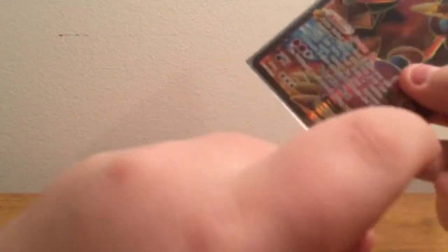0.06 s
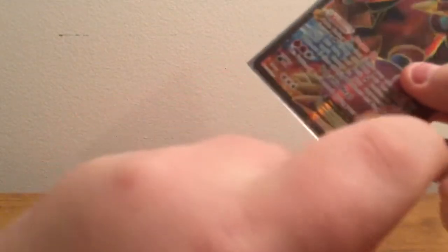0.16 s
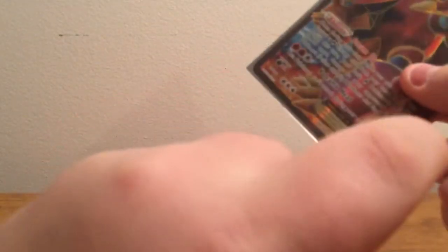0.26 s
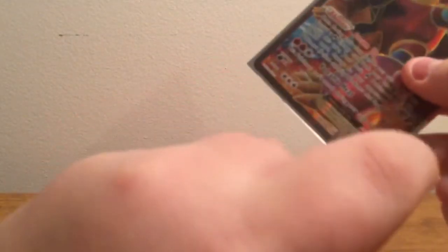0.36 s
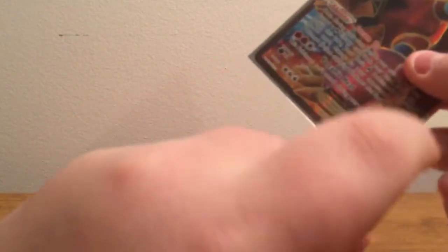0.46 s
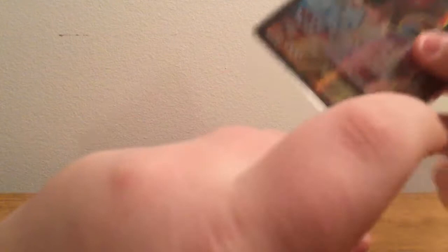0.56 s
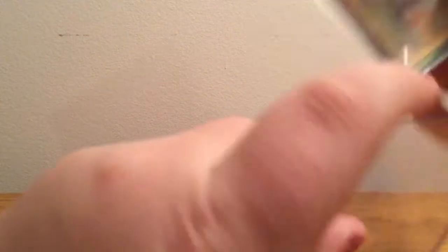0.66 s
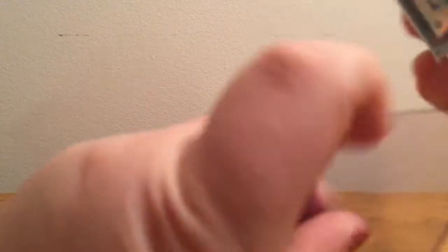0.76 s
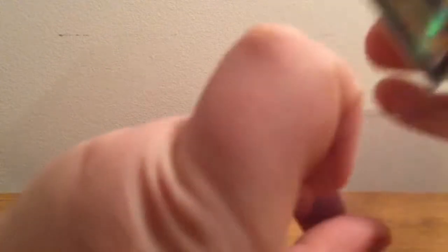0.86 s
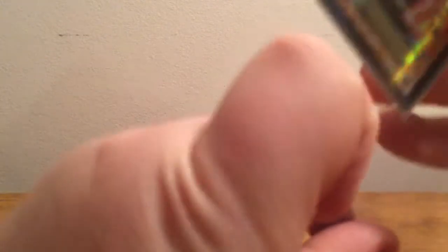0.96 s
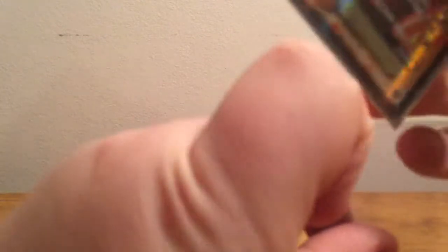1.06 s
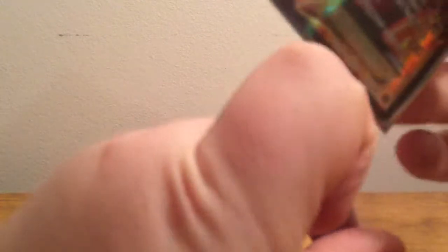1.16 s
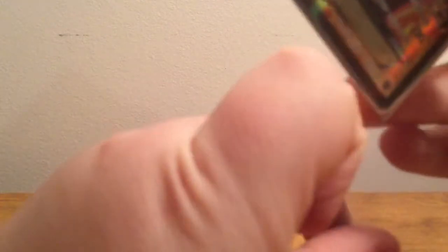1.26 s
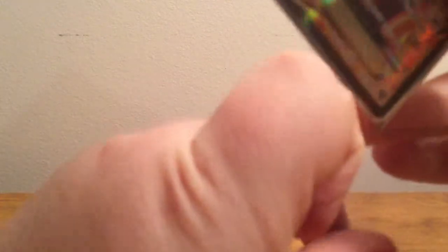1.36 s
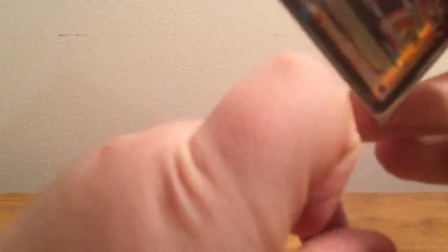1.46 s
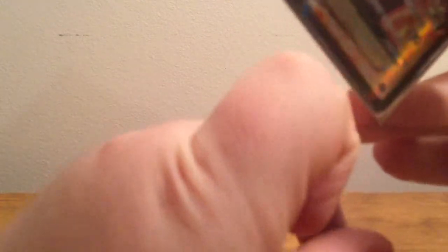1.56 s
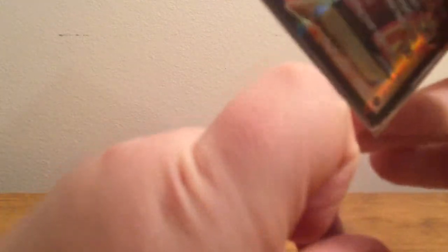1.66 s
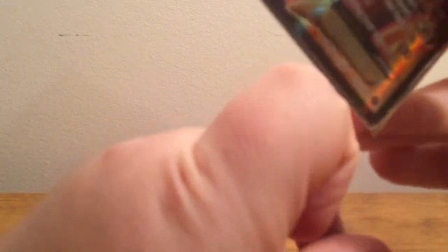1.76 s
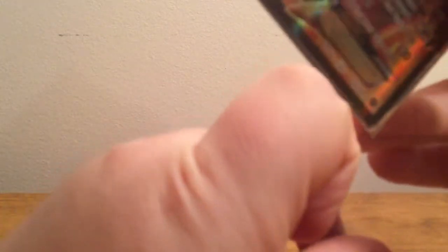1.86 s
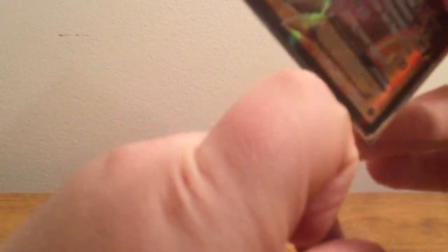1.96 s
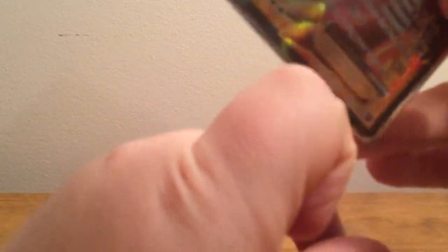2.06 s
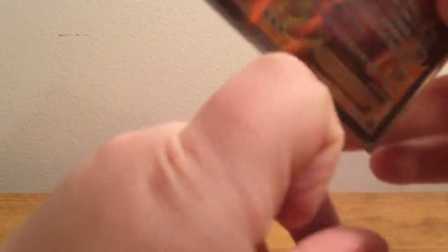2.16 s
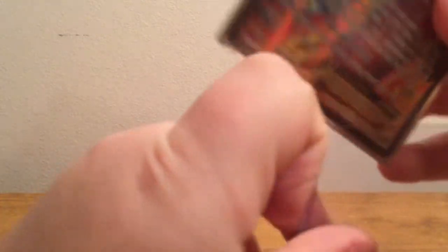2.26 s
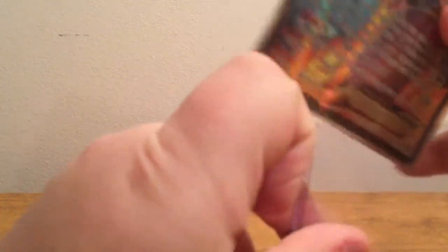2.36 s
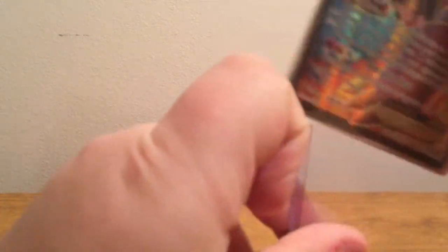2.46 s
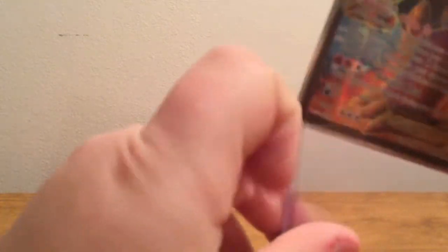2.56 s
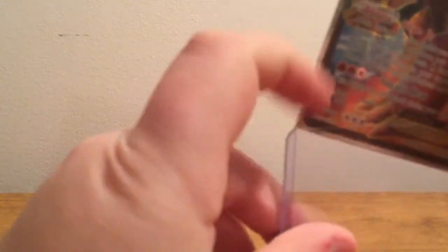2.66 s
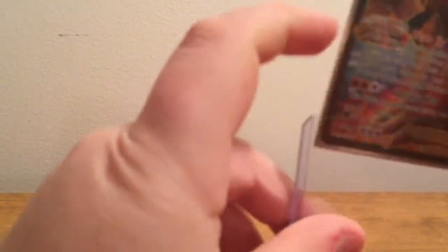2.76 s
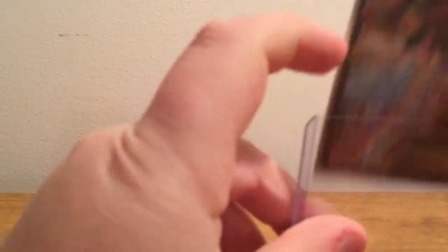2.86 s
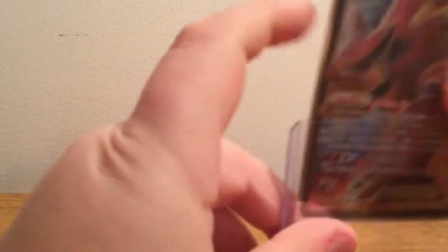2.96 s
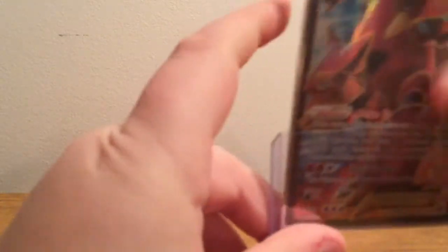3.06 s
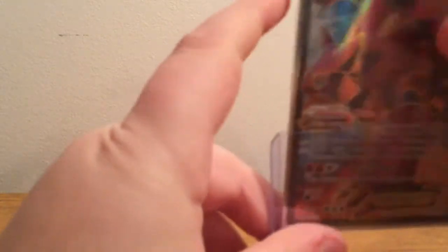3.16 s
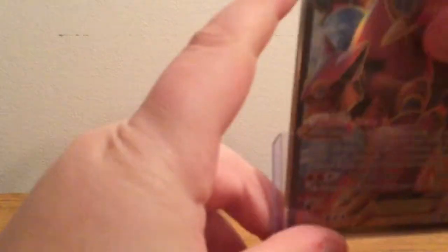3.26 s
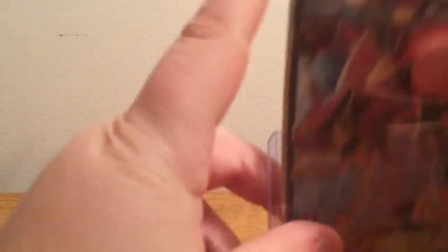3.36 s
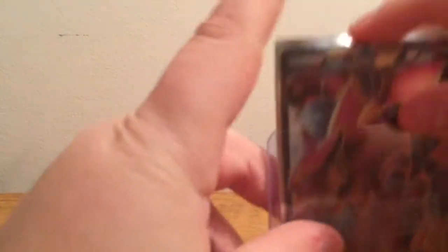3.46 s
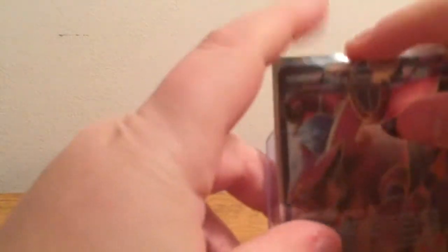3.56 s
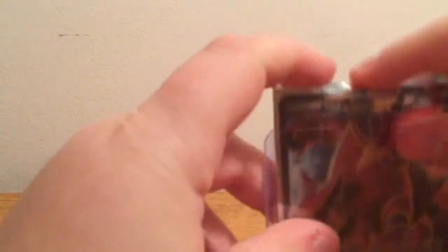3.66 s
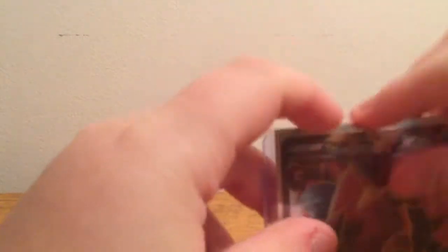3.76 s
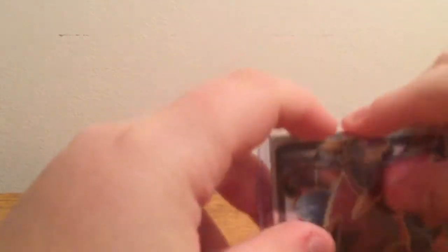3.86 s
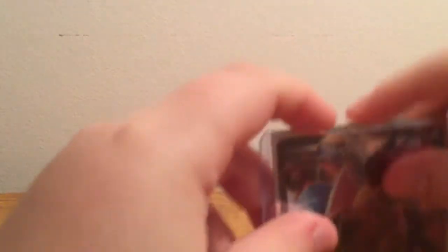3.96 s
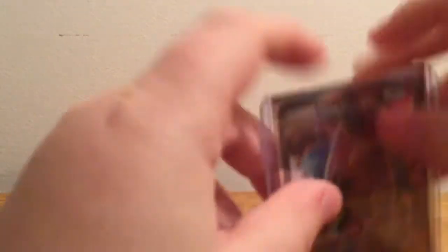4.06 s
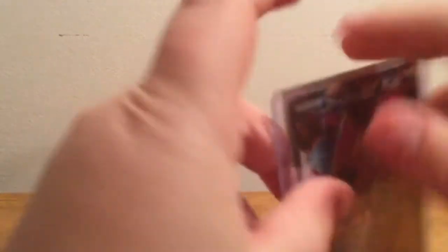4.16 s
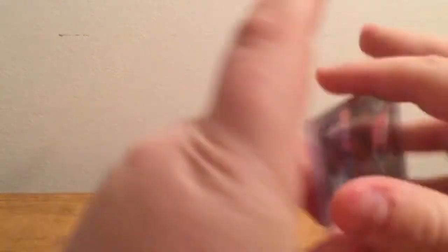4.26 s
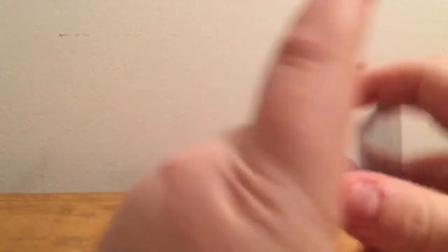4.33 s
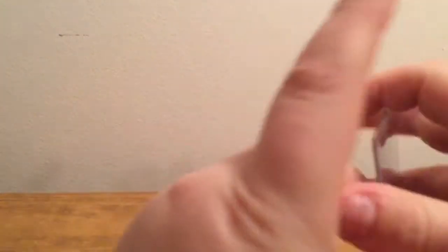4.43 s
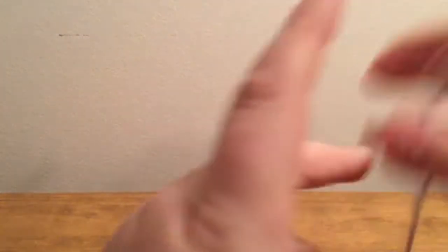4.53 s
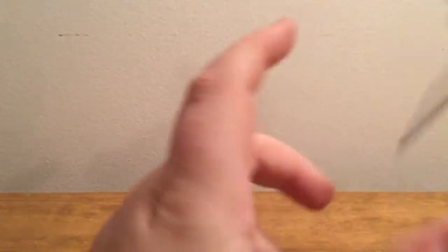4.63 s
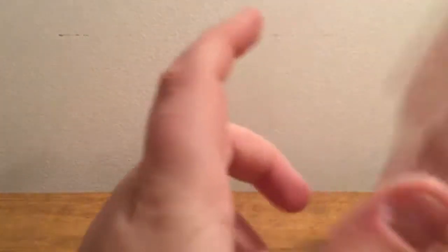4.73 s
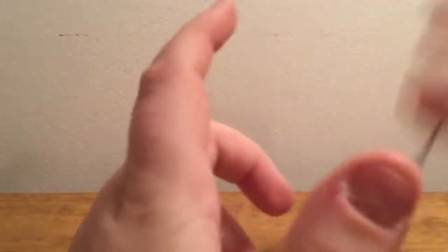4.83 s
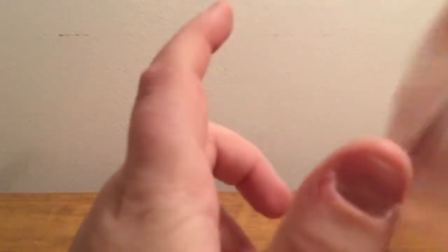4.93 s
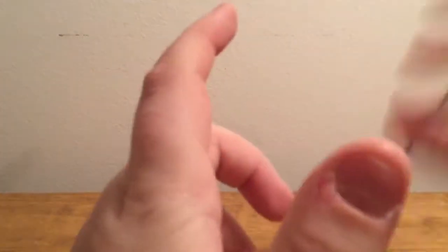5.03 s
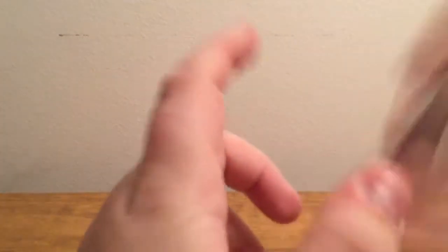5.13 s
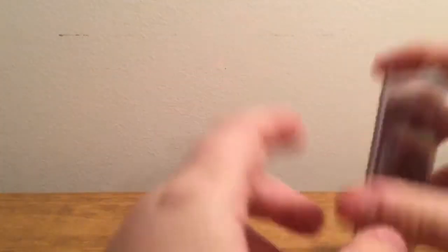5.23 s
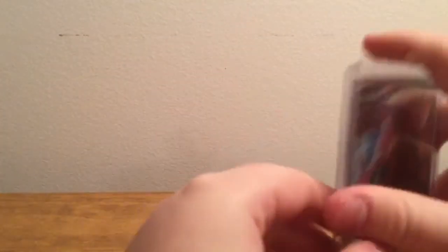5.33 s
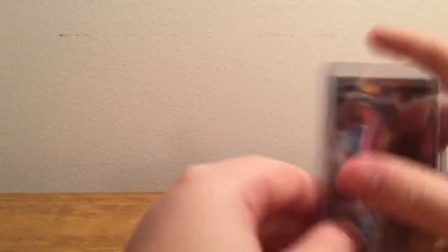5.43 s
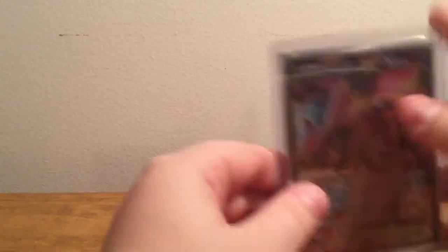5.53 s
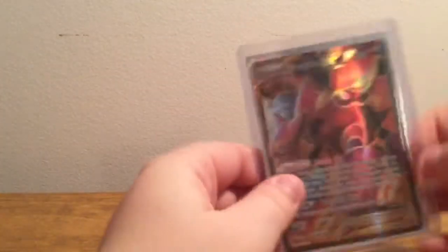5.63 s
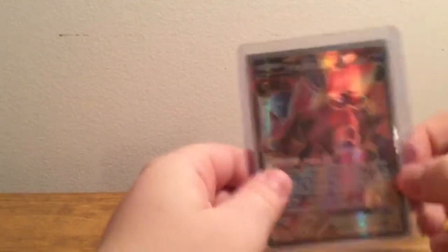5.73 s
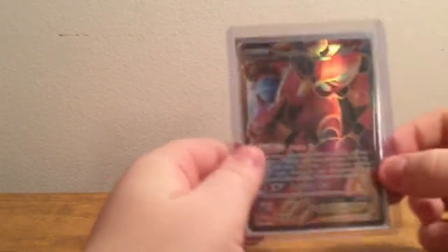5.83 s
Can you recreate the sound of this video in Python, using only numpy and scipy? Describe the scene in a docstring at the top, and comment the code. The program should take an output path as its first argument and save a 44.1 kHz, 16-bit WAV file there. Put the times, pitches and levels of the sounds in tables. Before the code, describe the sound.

A sleeved trading card and a rigid plastic holder are handled close to the microphone in a small room with a faint low rumble. For the first two seconds there are only soft bumps, a brief rub and tiny ticks. At about 2.3 seconds a sleeve corner snaps with a crisp click, and more clicks and a light knock follow between 2.7 and 3 seconds. From 3 to 4.1 seconds the card slides into the holder in quiet, uneven shoves, plastic rubbing on plastic with tiny high squeaks and a faint zip near 3.8. A double knock comes at 4.4. At 4.8, 5.0 and 5.2 seconds the holder is rapped on the wooden table, three sharp, woody clacks, by far the loudest sounds, each with a very short room echo. A small tick, a faint slide and soft bumps follow from 5.4 to 5.9 seconds.

```python
"""A small room, close to a wooden table, where a sleeved trading card is pushed into a rigid holder.
The sleeve's corners tick as they snap free, and plastic sticking and slipping on plastic rubs, zips and
squeaks among light knocks of the hands. Three loud raps of the holder ring the table and seat the card,
which lands inside just after each one. The walls answer briefly over the room's own low rumble."""
import sys
import numpy as np
from scipy import signal
from scipy.fft import rfft, irfft, next_fast_len
from scipy.io import wavfile
from scipy.ndimage import uniform_filter1d, minimum_filter1d, map_coordinates

SR = 44100
rng = np.random.default_rng(int(sys.argv[2]) if len(sys.argv) > 2 else 0)


def dump_mix(stems):
    """Bounce the given channels to the path in sys.argv[1] as a 16-bit WAV at rate SR."""
    frames = np.atleast_2d(stems).T  # one column per channel
    limited = np.clip(frames, -1, 1)  # hard clip at full scale
    pcm = np.round(limited * 32767).astype(np.int16)
    wavfile.write(sys.argv[1], SR, pcm)


N = 259837


# The holder rapped on the table. Each row: start in seconds, level in dB, contact hardness in Hz,
# thump and clack trims in dB, seconds until the card lands, the landing's thump trim in dB.
RAPS = [(4.808, -9.5, 2450, -5.5, -12.5, 0.0086, -0.5), (5.0186, -9.5, 2200, 0.5, -12, 0.0058, -3.5),
        (5.219, -11.5, 2700, 2.5, -4.5, .003, -6.5)]
# Light knocks of the hands and the holder's edge on the table.
# Each row: start in seconds, level in dB, contact hardness in Hz, thump and clack trims in dB.
KNOCKS = [(0.001, -46.5, 1800, 4.5, -3.5), (0.357, -44.5, 410, 5, -12.5), (0.3621, -41.5, 2520, 3.5, -4.5),
          (1.519, -61, 890, 15.5, -23), (2.013, -44.5, 990, -2.5, -38), (2.133, -54, 1360, -2, -27),
          (2.3261, -40.5, 1050, -2, -25), (2.3497, -48, 1140, 3, -30), (2.7452, -32.5, 990, 3.5, -19.5),
          (3.2238, -48.5, 1310, 0.5, -32), (4.411, -25, 1330, 1, -19.5), (4.4389, -23.5, 1506, -7, -19.5),
          (4.4779, -37.5, 1150, -20, -21), (5.693, -56.5, 302, 14.5, -21), (5.763, -54, 505, 13.5, -19),
          (5.824, -55.5, 292, 17, -16.5)]

def blows(landing_db=-11, landing_hard_hz=4400, landing_clack_db=5):
    """Every hit on the table: light knocks, raps, and the card landing in the holder after each rap."""
    raps = [row[:-2] for row in RAPS]
    landings = [(start + delay, landing_db, landing_hard_hz, thump_db, landing_clack_db)
                for start, *_, delay, thump_db in RAPS]
    return [*KNOCKS, *raps, *landings]


# Table top and holder ringing together. Each row: mode frequency in Hz, relative level in dB.
TABLE_MODES = [(140, -18), (170, -19), (222, -8), (240, -2.5), (290, -20), (336, -11), (395, -14),
               (641, -14.5), (702, -5), (768, -3), (915, -1.5), (1030, -1), (1152, 2.5), (1250, -2),
               (1348, -6), (1605, -1), (1680, -8.5), (1895, -5.5), (2150, -10.5), (2305, -10), (2393, -4.5),
               (2560, -6.5), (2684, -4.5), (2823, -5), (3242, -12.5), (3520, -19.5), (3797, -3.5),
               (3953, -15), (4600, -14.5), (4850, -17.5)]
# The dense, brief clack of stiff plastic. Each row: frequency in Hz, relative noise level in dB.
CLACK = [(200, -9.5), (1000, 4.5), (2700, 1), (4800, -9), (6500, -17.5), (8500, -29), (12000, -31),
         (16000, -39)]

def table_hits(ring_db=-2.5, ring_t60=0.052, thump_hz=450, scatter_db=2.0, attack_s=0.00026):
    """Each blow rings the table's modes and adds a plastic clack, topped by a still shorter crack."""
    out, t = np.zeros(N), np.arange(SR // 3) / SR
    hz, mode_db = np.transpose(TABLE_MODES)[:, :, None]
    mode_t60 = ring_t60 * np.sqrt(1000 / hz)  # higher modes die sooner
    rise = 1 - np.exp(-t / attack_s)
    for start, db, hard_hz, thump_db, clack_db in blows():
        rolloff = 1 / np.sqrt(1 + (hz / hard_hz) ** 6)  # a soft, long contact cannot drive high modes
        scatter = scatter_db * rng.standard_normal(hz.shape)
        strength = rolloff * amp(mode_db + thump_db * (hz < thump_hz) + scatter)
        offset = rng.random(hz.shape) * (hz > thump_hz)  # the thump's modes start in phase
        modes = strength * decay(t, mode_t60) * np.sin(2 * np.pi * (hz * t + offset))
        ring = amp(ring_db) * modes.sum(axis=0)
        clack = noise(CLACK, len(t)) * decay(t, t60=0.033)
        crack = amp(-10) * noise(SNAP, len(t)) * decay(t, t60=0.01)
        add(out, start, amp(db) * (ring + amp(clack_db) * (clack + crack)) * rise)
    # The small top has a dead band between its drum-like and woody modes, and radiates little deep bass.
    dead_band = signal.iirnotch(515, Q=515 / 170, fs=SR)
    bass_cut = signal.butter(4, 125, "high", fs=SR, output="sos")
    return signal.sosfilt(bass_cut, signal.lfilter(*dead_band, out))


# Loose, even slides of card and sleeve. Each row: start and length in seconds,
# then the drive in dB on the hollow body, flexing walls, edge rasp and sleeve hiss.
SLIDES = [(0, .04, -52, -60.5, -78, -72), (0.047, 0.087, -67, -76, -74, -75),
          (2.128, 0.042, -69, -69, -72.5, -62.5), (2.17, 0.048, -56.5, -63, -78, -87),
          (2.245, 0.35, -74, -84, -85, -70), (2.631, 0.061, -61.5, -79, -73.5, -65),
          (2.921, 0.11, -51.5, -67, -68, -55), (3.06, 0.043, -61, -83, -73, -71.5),
          (3.236, 0.026, -57, -70.5, -78, -64), (3.306, 0.065, -66, -69.5, -76, -67.5),
          (3.378, 0.18, -68.5, -63.5, -70.5, -59.5), (3.55, 0.177, -65.5, -61, -70.5, -67),
          (3.743, 0.088, -62.5, -61.5, -68, -61), (4.082, .035, -78, -85, -90, -67.5),
          (4.226, 0.076, -86, -90, -85, -74.5), (4.383, 0.013, -64, -72, -67.5, -61.5),
          (5.428, 0.054, -73, -72.5, -64.5, -60), (5.537, .35, -95, -85, -79, -76.5)]
# Shoves against the holder's tight grip. Each row: peak time, rise and fall in seconds,
# drive on the walls in dB, then edge rasp and sleeve hiss in dB relative to that drive.
SHOVES = [(2.985, 0.033, 0.028, -60.5, 4, 0), (3.678, .015, 0.035, -45.5, -8, -6.5),
          (3.779, 0.0093, 0.0066, -46, -3.5, -10), (3.896, 0.032, 0.025, -44, -16, -34),
          (3.919, 0.017, 0.038, -43, -2.5, -19), (4.027, 0.023, 0.0099, -44.5, 0, -12.5)]

def strokes(slide_rise_s=0.013, slide_fall_s=0.0094, shove_hollow_db=-50):
    """How hard the hand drives cavity, walls, edge and sleeve: slides hold, shoves swell and let go."""
    drive = np.zeros((4, N))
    for start, length, *part_db in SLIDES:
        envelope = swell(start, start + length, slide_rise_s, slide_fall_s)
        drive = np.maximum(drive, amp(part_db)[:, None] * envelope)
    for peak, rise, fall, db, rasp_db, hiss_db in SHOVES:
        part_db = [shove_hollow_db, db, db + rasp_db, db + hiss_db]
        drive = np.maximum(drive, amp(part_db)[:, None] * swell(peak, peak, rise, fall))
    return drive


# The four colours of the rub, dark to bright. Each row: frequency in Hz, relative noise level in dB.
CAVITY_HOLLOW = [(120, -17), (280, 2.5), (540, -4.5), (720, 0.5), (860, -6.5), (1300, -39)]
WALL_FLEX = [(650, -20.5), (900, -3.5), (1150, 4), (1450, -3.5), (1900, -11.5), (2800, -45)]
EDGE_RASP = [(1400, -31.5), (2000, 5), (2550, -0.5), (3050, 0.5), (3550, -1.5), (4400, -3), (6000, -15),
             (9000, -37)]
SLEEVE_HISS = [(2500, -54), (5000, -2), (7200, -3), (9000, -2), (12000, -5.5), (15800, -5.5)]

def rubbing(slip_db=1.0, grip_db=1, catch_db=2.5):
    """Tiny slips under a wavering grip excite the holder's cavity, walls and edge and the thin sleeve."""
    hollow, flex, rasp, hiss = strokes()
    slips = unit(amp(slip_db * wobble(rate=450) + grip_db * wobble(rate=70)))
    catches = unit(amp(catch_db * wobble(rate=300)))  # the cut edge catches in coarser grains
    walls = amp(1.5) * flex * shifting_noise(WALL_FLEX, depth_db=4, patch_hz=170)
    cavity = amp(-1) * hollow * noise(CAVITY_HOLLOW)
    edge = amp(-1) * rasp * catches * shifting_noise(EDGE_RASP, depth_db=3, patch_hz=262)
    sleeve = amp(-1) * hiss * shifting_noise(SLEEVE_HISS, depth_db=2.5, patch_hz=450)
    return slips * (cavity + walls + edge + sleeve)


# Sleeve corners catching and snapping free.
# Each row: start in seconds, level in dB, the rigid edge's share in dB relative to the snap.
TICKS = [(.647, -61, 0), (0.738, -60, -20), (1.2436, -61.5, -20), (1.3509, -55, -25), (1.517, -50.5, -4.5),
         (2.252, -54, -6), (2.3192, -28, -23), (2.582, -58.5, 2), (2.743, -37.5, -7), (2.9212, -31, -5.5),
         (2.9567, -37, 0), (3.233, -48, -22), (3.260, -55, -10), (3.2984, -51.5, -18), (3.7762, -37, -14),
         (4.1092, -54, -22), (4.624, -54, -12), (5.499, -46.5, -4)]
# The bright snap of plastic. Each row: frequency in Hz, relative noise level in dB.
SNAP = [(300, -52.5), (2200, -58.5), (4000, -2.5), (7500, -1.5), (9000, -4.5), (12000, -2.5), (16000, -11)]

def sleeve_ticks(snap_t60=0.0089, flutter_db=-21, flutter_t60=0.06, attack_s=0.0007):
    """A corner snaps free and may catch the holder's edge; the film's flutter leaves a faint tail."""
    out, t = np.zeros(N), np.arange(SR // 8) / SR
    rise = 1 - np.exp(-t / attack_s)
    fade = decay(t, snap_t60) + amp(flutter_db) * decay(t, flutter_t60)
    for start, db, edge_db in TICKS:
        colour = noise(SNAP, len(t)) + amp(edge_db) * noise(EDGE_RASP, len(t))
        add(out, start, amp(db) * colour * fade * rise)
    return out


# The card sings as it slides, higher when faster. Each row: time in seconds, pitch in Hz, level in dB.
ZIP = [(3.3, 1050, -68), (3.46, 1200, -64.5), (3.51, 1550, -66), (3.55, 1230, -61), (3.62, 1240, -64),
       (3.72, 1050, -68), (3.77, 1380, -51), (3.82, 2060, -60), (3.84, 2020, -87)]
# Film sticking and slipping on plastic.
# Each row: peak time in seconds, pitch in Hz, level in dB, length in seconds.
SQUEAKS = [(2.45, 10900, -64, 0.0056), (2.472, 13200, -64, 0.011), (2.637, 6700, -63.5, 0.014),
           (3.427, 8070, -61, 0.032), (3.452, 7000, -66, .015), (3.535, 7130, -56, 0.013)]

def zip_and_squeaks(upper_ratio=1.35, upper_db=-7):
    """Nearly regular slips make fuzzy tones: a gliding two-toned zip and short high squeaks."""
    t = np.arange(N) / SR
    times, *columns = np.transpose(ZIP)
    zip_hz, zip_db = [np.interp(t, times, column, left=-140, right=-140) for column in columns]
    phase = 2 * np.pi * np.cumsum(zip_hz) / SR
    lower = fuzz(rate=150) * np.exp(1j * phase)
    upper = fuzz(rate=150) * np.exp(1j * upper_ratio * phase)
    out = amp(zip_db) * (lower + amp(upper_db) * upper)
    grain = fuzz(rate=900)
    for peak, hz, db, length in SQUEAKS:
        envelope = np.exp(-(2 * (t - peak) / length) ** 2)
        out += amp(db) * envelope * grain * np.exp(2j * np.pi * hz * t)
    return out.real


# The room's short tail. Each row: frequency in Hz, seconds to fall by 60 dB.
ROOM_T60 = [(150, 0.17), (400, 0.23), (1000, 0.2), (3500, 0.2), (6000, 0.2), (14000, .11)]
# The colour of the walls' answer. Each row: frequency in Hz, relative level in dB.
ROOM_COLOUR = [(100, 4), (400, 8.5), (1000, -3.5), (3500, 3.5), (7000, -1), (15000, 8)]

def room_reverb(near, gap_s=0.0057, build_s=0.0027):
    """The walls answer after a short gap, and each frequency dies at its own speed."""
    out, block = np.zeros(N), SR // 5
    for start in range(0, N, block):  # a fresh tail for each block
        hz, t, spectrum = signal.stft(rng.standard_normal(SR // 3), SR, nperseg=256)
        fade = decay(t, along(ROOM_T60, hz)[:, None])
        colour = amp(along(ROOM_COLOUR, hz))[:, None]
        tail = signal.istft(spectrum * fade * colour, SR, nperseg=256)[1]
        tail *= np.clip((np.arange(len(tail)) / SR - gap_s) / build_s, 0, 1)
        add(out, start / SR, signal.fftconvolve(near[start:start + block], tail / np.linalg.norm(tail)))
    return out


# The bed of room tone. Each row: frequency in Hz, relative noise level in dB.
RUMBLE = [(15, -47.5), (25, -25.5), (53, -7), (87, -16), (149, 0), (206, -8.5), (242, -0.5), (285, -13.5),
          (439, -16), (607, -22.5), (677, -28.5), (734, -23), (840, -30), (5000, -42.5), (16000, -53)]

def room_tone(level_db=-59, waver_db=1.36):
    """A low rumble that wavers a little, under faint hiss."""
    return amp(level_db) * noise(RUMBLE) * unit(amp(waver_db * wobble(rate=10)))


def amp(db):
    """Decibels to gain."""
    return 10 ** (np.asarray(db) / 20)


def unit(x):
    """The signal scaled to rms 1."""
    return x / np.sqrt(np.mean(x ** 2) + 1e-20)


def along(points, hz):
    """A curve of (Hz, value) points read on a log frequency axis."""
    knot_hz, values = np.transpose(points)
    return np.interp(np.log(hz + 1), np.log(knot_hz + 1), values)


def decay(t, t60):
    """A fade that falls by 60 dB every t60 seconds."""
    return np.exp(-np.log(1000) * t / t60)


def swell(start, end, rise, fall):
    """Gain that rises smoothly to 1 at start, holds until end and dies away."""
    t = np.arange(N) / SR
    before, after = np.maximum(start - t, 0) / rise, np.maximum(t - end, 0) / fall
    return np.exp(-np.minimum(before ** 2 + after ** 2, 20))


def wobble(rate):
    """A smooth random curve of rms 1, with rate knots a second."""
    knots = rng.standard_normal(int(N * rate / SR) + 4)
    return unit(map_coordinates(knots, [np.arange(N) * rate / SR]))


def fuzz(rate):
    """Random level and phase that blur a tone into a narrow band."""
    return wobble(rate) + 1j * wobble(rate)


def noise(colour, size=N):
    """Noise of rms 1 with the given colour."""
    padded = next_fast_len(size)
    gain = amp(along(colour, np.fft.rfftfreq(padded, 1 / SR)))
    return unit(irfft(rfft(rng.standard_normal(padded)) * gain, padded)[:size])


def shifting_noise(colour, depth_db, patch_hz, patch_s=0.055):
    """Coloured noise whose narrow resonances come and go as the contact point travels."""
    hz, t, spectrum = signal.stft(noise(colour), SR, nperseg=512)
    knots = rng.standard_normal((int(hz[-1] / patch_hz) + 2, int(t[-1] / patch_s) + 2))
    patches = map_coordinates(knots, np.meshgrid(hz / patch_hz, t / patch_s, indexing="ij"), order=2)
    return unit(signal.istft(spectrum * amp(depth_db * patches), SR, nperseg=512)[1][:N])


def add(track, start, sound):
    """Mix a sound into the track at start seconds."""
    part = track[max(round(start * SR), 0):][:len(sound)]
    part += sound[:len(part)]


def scene(wet_db=-10.5):
    """Hands, card and table up close, with the small room behind them, in mono."""
    near = table_hits() + sleeve_ticks() + rubbing() + zip_and_squeaks()
    return (near + amp(wet_db) * room_reverb(near) + room_tone())[None]


def record(dry, ceiling=0.98, saturation=0.73, knee=5, top_hz=16100):
    """A fast limiter and soft saturation hold the raps down; a steep low-pass trims the very top."""
    needed_gain = np.minimum(1, ceiling / (np.abs(dry) + 1e-9))
    held = dry * uniform_filter1d(minimum_filter1d(needed_gain, size=65), size=65)
    rounded = held / (1 + np.abs(held / saturation) ** knee) ** (1 / knee)
    padded = next_fast_len(N + SR // 4)
    low_pass = 1 / (1 + (np.fft.rfftfreq(padded, 1 / SR) / top_hz) ** 100)
    return irfft(rfft(rounded, padded) * low_pass, padded)[..., :N]


dry = scene()
out = record(dry)
dump_mix(out)
```